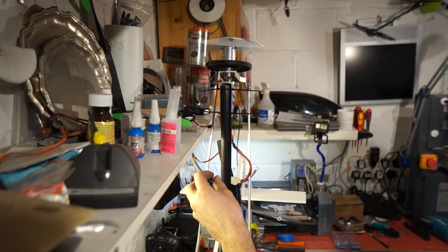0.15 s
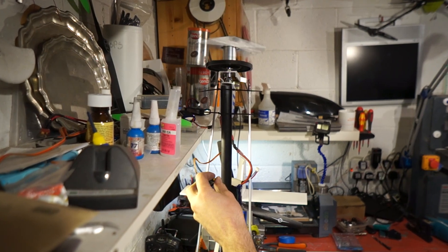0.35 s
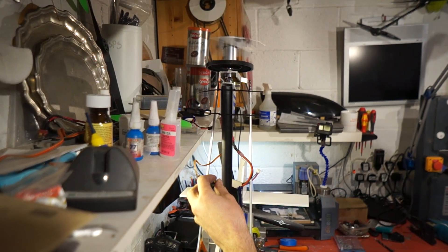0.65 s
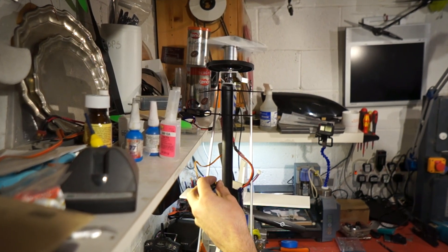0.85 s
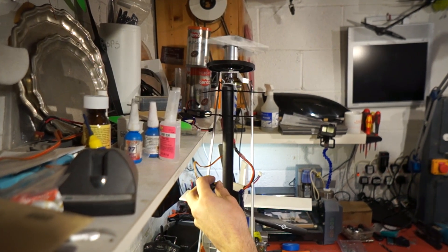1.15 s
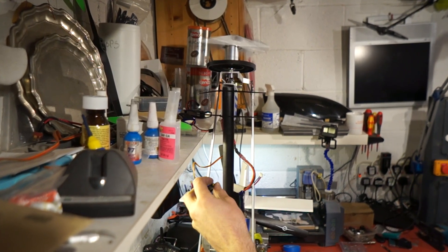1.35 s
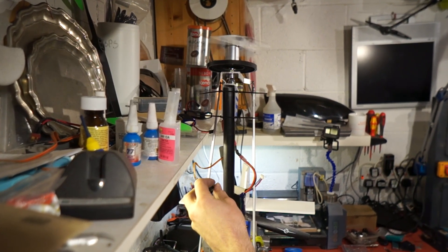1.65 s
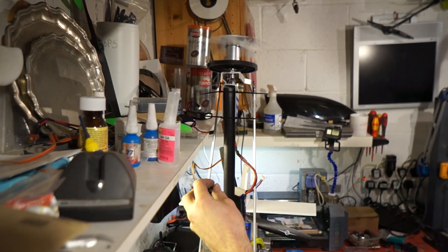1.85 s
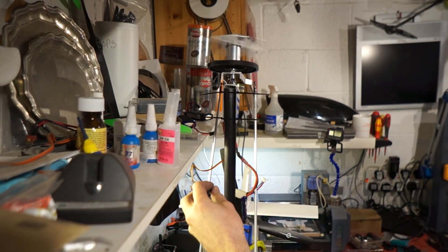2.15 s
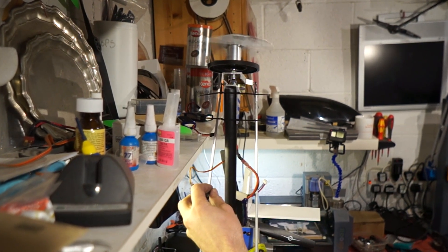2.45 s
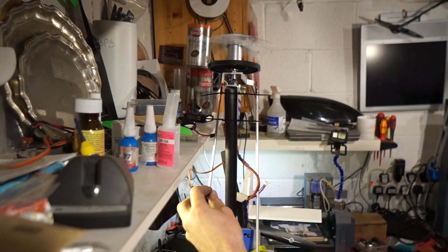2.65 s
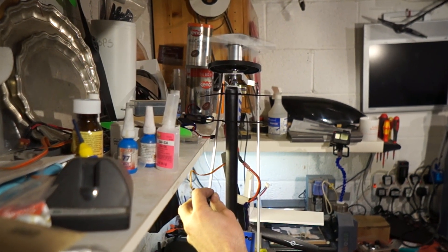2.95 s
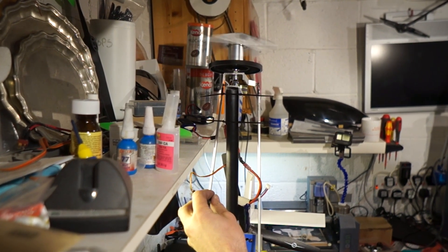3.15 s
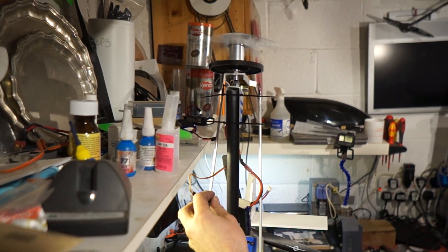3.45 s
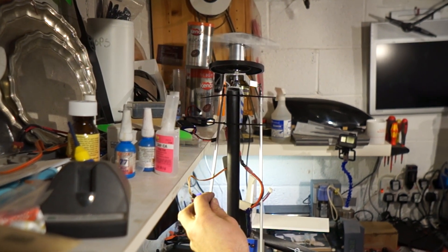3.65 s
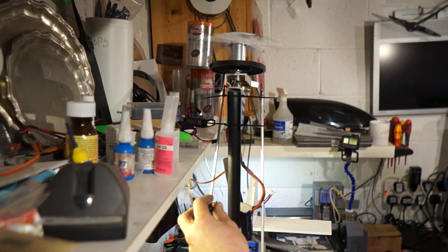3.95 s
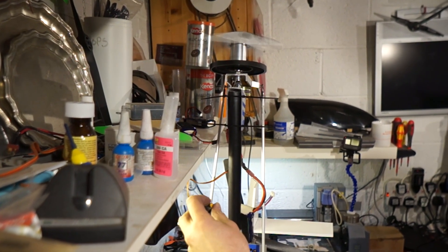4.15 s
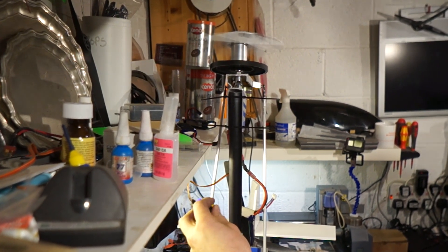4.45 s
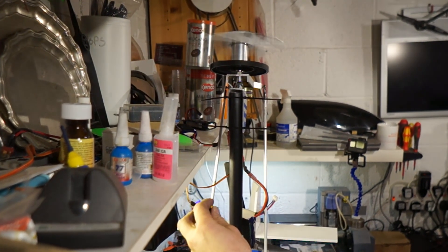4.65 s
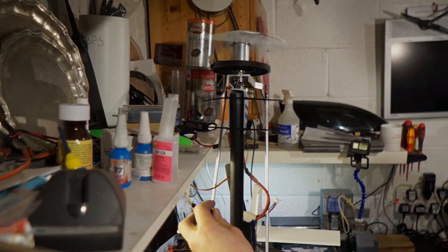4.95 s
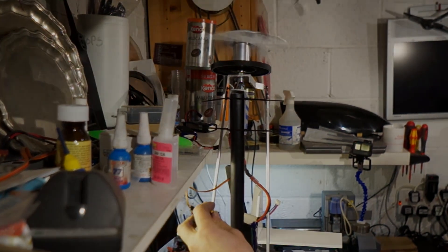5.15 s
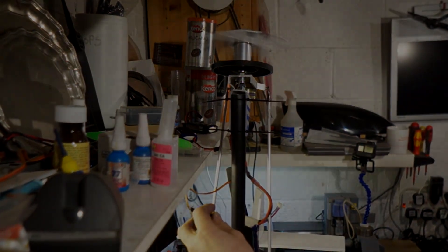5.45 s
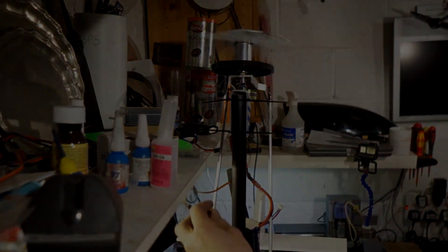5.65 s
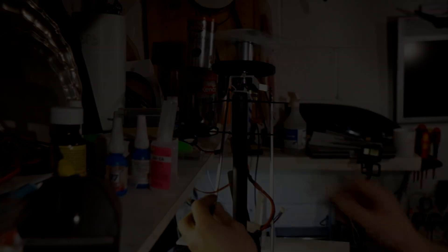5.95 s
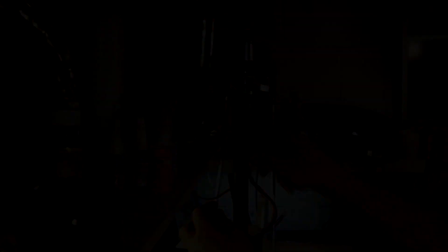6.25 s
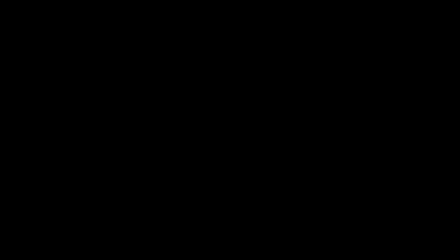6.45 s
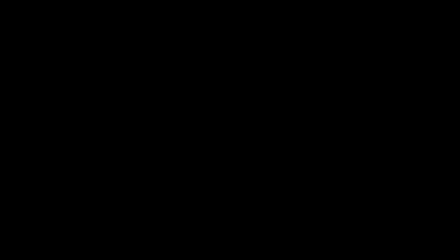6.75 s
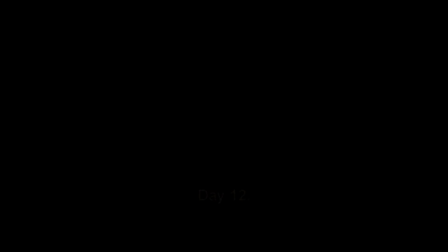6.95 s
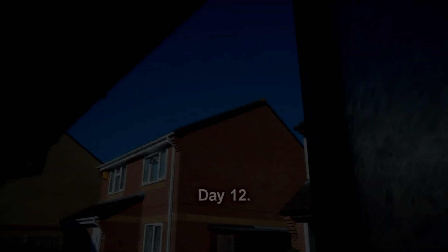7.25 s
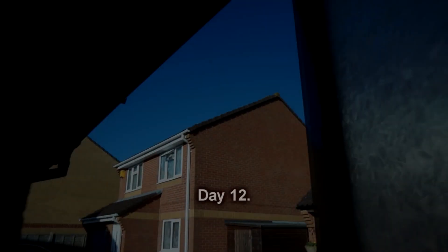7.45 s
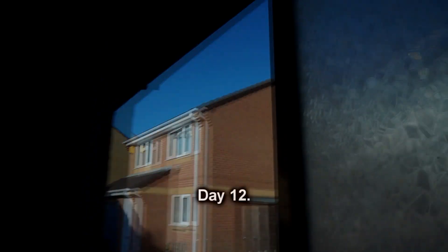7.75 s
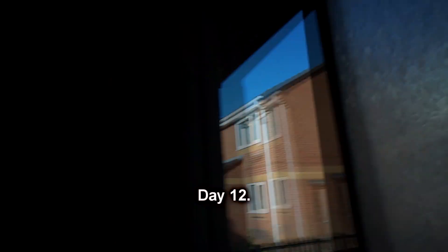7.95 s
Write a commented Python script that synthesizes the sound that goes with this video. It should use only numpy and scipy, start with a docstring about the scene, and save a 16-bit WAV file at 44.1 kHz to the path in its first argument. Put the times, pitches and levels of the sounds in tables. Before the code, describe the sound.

A small electric motor whines and scrapes, its pitch dipping then climbing as it fades away, then a quiet room and a window handle clunking.

```python
"""A small brushless motor on a workshop stand spins a geared, slightly loose rotor: its pole whine, made of
gliding sines, dips, climbs and settles, while shaped noise scrapes once a turn and rings the stand; it all fades out.
A quiet room by a window fades in as hiss and a far narrow-band drone, with two swept-sine bird chirps between houses,
a noise rustle, then a window handle that clicks, squeaks and clunks: noise bursts into ringing modes."""
import sys
import numpy as np
from scipy import signal
from scipy.fft import rfft, irfft, next_fast_len
from scipy.io import wavfile
from scipy.ndimage import uniform_filter1d, map_coordinates

SR = 44100
rng = np.random.default_rng(int(sys.argv[2]) if len(sys.argv) > 2 else 0)


def materialize(psi):
    """Save the field psi as 16-bit PCM at rate SR to the path in sys.argv[1].

    A 1-D psi becomes a single channel; in a 2-D psi each row is a channel.
    """
    bounded = np.clip(np.atleast_2d(psi).T, -1, 1)
    quanta = np.round(bounded * 32767).astype(np.int16)
    wavfile.write(sys.argv[1], SR, quanta)


def invert_db(level):
    """Linear amplitude ratio for a level in decibels (20 dB per decade), elementwise."""
    return 10 ** (np.asarray(level, dtype=float) / 20)


N = 357210

# motor speed, heard as the centre pitch of the pole whine: (time [s], whine pitch [Hz])
SPIN = [(0, 2115), (.25, 1912), (.35, 1855), (.55, 1805), (.65, 1835), (.75, 1912), (.85, 1960),
        (1.05, 2010), (1.3, 2038), (1.65, 2050), (1.95, 2168), (2.25, 2239), (2.45, 2310), (2.95, 2407),
        (3.15, 2430), (3.35, 2494), (3.55, 2580), (3.75, 2690), (3.95, 2755), (4.42, 2778), (4.49, 2874),
        (4.56, 2886), (6.8, 2885)]
# resonances of stand and rotor, before a lift common to all: (centre [Hz], width [Hz], level [dB])
STAND = [(200, 14, -5), (751, 14, -2), (1092.7, 26, 4), (1384, 68, -7), (1712, 24, -3), (2850, 230, -4),
         (3720, 320, -8.5), (4945, 110, -11), (5730, 500, -12), (6110, 150, -12.5), (7240, 190, -9),
         (10950, 110, -15), (8580, 320, -8.5), (9890, 310, -5.5), (4204, 63, -8.5), (13400, 230, -7.5),
         (15100, 330, -4.5)]
# start and end of the workshop's fade-out: (start [s], end [s])
FADE = (3, 6.8)
# left-right correlation by the window: (frequency [Hz], likeness [0-1])
ALIKE_ROOM = [(130, 0.81), (640, 0.84), (6800, 0.75), (15000, .99)]
# colour shared by room hiss and rustle: (frequency [Hz], relative level [dB])
AIR_COLOUR = [(60, -49.5), (130, -26), (274, -13), (400, -16.5), (636, -4), (1410, -10), (2800, -5),
              (6000, -13), (16000, -28.5)]
# ringing modes of the window frame: (frequency [Hz], relative level [dB], 60 dB decay time [s])
FRAME = [(290, -6.5, 0.076), (564, -1, 0.087), (700, -7.5, 0.025), (1057, -4, 0.057), (1500, -3.5, .06),
         (1790, -4.5, 0.038), (2300, -3, .03), (2720, -2.5, .04), (3190, -2.5, 0.054), (4000, -12, 0.035)]
WHINE_CYCLES = 14  # whine cycles per shaft turn


def unit(x):
    """Scaled to rms 1."""
    return x / np.sqrt(np.mean(x ** 2) + 1e-20)


def along(points, hz):
    """Value at each frequency, from (Hz, value) points joined on a log axis."""
    f, v = np.transpose(points)
    return np.interp(np.log(hz + 1), np.log(f + 1), v)


def curves(rows, edge=None):
    """One value per sample for each column after the time; edge is the value outside the listed times."""
    s, *cols = np.transpose(rows)
    return [np.interp(np.arange(N) / SR, s, c, edge, edge) for c in cols]


def wobble(rate):
    """A smooth random curve, rate knots a second."""
    knots = rng.standard_normal(int(N * rate / SR) + 4)
    return map_coordinates(knots, [np.arange(N) * rate / SR])


def filtered(x, response):
    """x filtered by a zero-phase gain over frequency."""
    m = next_fast_len(N + 8192)
    return irfft(rfft(x, m) * response(np.fft.rfftfreq(m, 1 / SR)), m)[..., :N]


def noise(gain, alike):
    """Stereo noise of rms 1, coloured by gain, its left-right correlation set by the mid/side balance."""
    def mid_side_gain(hz):
        turn = np.arccos(np.clip(along(alike, hz), -1, 1)) / 2
        return gain(hz) * [np.cos(turn), np.sin(turn)]

    mid, side = filtered(rng.standard_normal((2, N)), mid_side_gain)
    return unit(np.array([mid + side, mid - side]))


def tone(hz, db):
    """A sine that follows a pitch and an rms level."""
    phase = 2 * np.pi * np.cumsum(hz + np.zeros(N)) / SR
    return np.sqrt(2) * invert_db(db) * np.sin(phase)


def echoes(x, t60, delay):
    """A stereo tail of noise that dies by 60 dB in t60 seconds, silent until delay seconds."""
    t = np.arange(SR // 2) / SR
    tail = rng.standard_normal((2, len(t))) * invert_db(-60 * t / t60) * (t > delay)
    return signal.fftconvolve(x[None], tail / np.linalg.norm(tail[0]), axes=1)[:, :N]


def stand(hz, lift_db):
    """Gain of the ringing stand: resonant power peaks over a flat base."""
    peaks = sum(invert_db(2 * (db + lift_db)) / (1 + (2 * (hz - c) / w) ** 2) for c, w, db in STAND)
    return np.sqrt(1 + peaks)


def motor():
    """Pole whine and overtones, shaft unbalance, and the drive's switching tone beating with the whine."""
    # drive and overtone balance by motor speed: (whine pitch [Hz], switching tone [dB],
    # switching + whine tone [dB], fourth harmonic [dB], whine left-right difference [dB])
    speed_points = [(1800, -53, -47.5, -60, 1), (2060, -55.5, -50.5, -58.5, 0),
                    (2150, -50, -41.5, -57, -0.5), (2500, -52, -36.5, -55, 4), (2520, -56, -46, -44, 20.5),
                    (2650, -62, -56, -38, 4.5), (2760, -61, -65.5, -45.5, 1), (2910, -69, -72.5, -54, -7.5)]
    # how loudly motor and stand radiate whine and octave at each pitch: (frequency [Hz], level [dB])
    radiate = [(1800, -39.5), (1850, -51), (1885, -43), (1910, -38.5), (2035, -35.5), (2055, -49),
               (2120, -33), (2165, -46), (2190, -28.5), (2300, -38), (2365, -28.5), (2490, -37),
               (2770, -22.5), (2800, -35), (2850, -21.5), (3600, -42), (4050, -40), (4250, -34.5),
               (4430, -37), (4560, -32), (4700, -24), (5000, -29), (5070, -55.5), (5800, -54)]
    switching_hz = 8008
    hz, = curves(SPIN)
    speeds, *columns = np.transpose(speed_points)
    switching_db, beat_db, fourth_db, pan_db = [np.interp(hz, speeds, c) for c in columns]

    whine = tone(hz + 3 * wobble(40), along(radiate, hz) + 1.8 * wobble(25))
    whine = whine * invert_db([pan_db / 2, -pan_db / 2])
    octave = tone(2 * hz + 12 * wobble(90), along(radiate, 2 * hz) + 3.1 * wobble(40))
    octave = octave * invert_db(np.outer([1.2, -1.2], wobble(2.6)))  # drifts left and right
    fourth = tone(4 * hz + 14 * wobble(60), fourth_db + 1.5 * wobble(15))
    drive = tone(switching_hz, switching_db + 2.8 * wobble(5))
    drive = drive + tone(switching_hz + hz, beat_db + 2.3 * wobble(17))

    # the unbalance is heard only near the stand's lowest mode
    shaft_hz = hz / WHINE_CYCLES
    sway_hz, sway_width, _ = STAND[0]
    hum = tone(shaft_hz, -51 + .8 * wobble(18)) / (1 + (2 * (shaft_hz - sway_hz) / sway_width) ** 2)
    return whine + octave + drive + fourth + hum


def catches():
    """Time, length, catch level and late level of every rotor turn, geared down from the shaft with random slack."""
    # catches that stand out, each replacing the usual one of its turn:
    # (time [s], catch level [dB], level late in the turn [dB])
    standouts = [(.034, -21.5, -27), (.099, -23, -31.5), (.162, -19, -26), (.237, -20, -33.5),
                 (.302, -26, -31), (.383, -20, -31), (.606, -22, -24), (.681, -21.5, -20.5),
                 (.76, -19, -22.5), (.908, -19.5, -28.5), (.974, -20.5, -29.5), (1.042, -20, -28),
                 (1.118, -21, -22.5), (1.253, -21, -22), (1.386, -21.5, -21), (1.457, -19.5, -20.5),
                 (1.598, -20.5, -22), (1.675, -21.5, -18.5), (1.798, -21, -20.5), (2.311, -22.5, -29),
                 (2.436, -21.5, -31), (3.201, -21.5, -24.5), (3.258, -22, -23), (3.65, -20.5, -24),
                 (3.807, -20.5, -21), (3.908, -20, -21), (4.205, -18.5, -22.5), (4.408, -18, -23),
                 (4.616, -21.5, -31), (4.9, -20, -26)]
    gear, first_turn, slack = 10.02, .39, .045  # shaft turns per rotor turn; first catch and scatter [turns]
    usual_catch_db, usual_late_db = -21.5, -25
    rate = curves(SPIN)[0] / (WHINE_CYCLES * gear)  # rotor turns per second
    angle = np.cumsum(rate) / SR
    luck = rng.standard_normal((int(angle[-1]), 3))

    catch_angle = first_turn + np.arange(len(luck)) + slack * luck[:, 0]
    s = np.interp(catch_angle, angle, np.arange(N) / SR)
    catch_db = usual_catch_db + 1.2 * luck[:, 1]
    late_db = usual_late_db + 2.3 * luck[:, 2]
    own_s, own_db, own_late_db = np.transpose(standouts)
    own = np.round(angle[(own_s * SR).astype(int)] - first_turn).astype(int)
    s[own], catch_db[own], late_db[own] = own_s, own_db, own_late_db
    return s, 1 / rate[(s * SR).astype(int)], catch_db, late_db


def patchy(x, depth_db):
    """Random gain patches in time and frequency, a few hundred hertz wide, alike in both channels."""
    z = signal.stft(x, nperseg=256)[2]
    field = uniform_filter1d(rng.standard_normal(z.shape[1:]), 3, 0)
    field = uniform_filter1d(field, 12, 1)
    return unit(signal.istft(z * invert_db(depth_db * unit(field)), nperseg=256)[1][:, :N])


def rotor():
    """Each turn the loose rotor catches suddenly, drags and lets go; small rattles roughen the drag."""
    # broad colour of the scrape: (frequency [Hz], relative level [dB])
    scrape_colour = [(400, -43), (1000, -16), (2900, -12), (6000, -3.5), (8000, -10.5), (10000, -10.5),
                     (14500, -16), (16000, -27)]
    # broad colour of the steady whirr under it: (frequency [Hz], relative level [dB])
    whirr_colour = [(25, -50.5), (100, -36), (450, -23), (700, -13), (1050, -6.5), (1500, -14.5),
                    (2900, -9), (6000, -11), (9000, -15), (16000, -28)]
    # left-right correlation in the workshop: (frequency [Hz], likeness [0-1])
    likeness = [(400, 0.99), (3300, .9), (6000, 0.93), (10000, 1), (15000, 1)]
    s, turn, catch_db, late_db = catches()
    free_db = np.roll(late_db, 1) - 5.0  # lighter contact just before the catch
    times = np.ravel([s - .004, s + 0.0054, s + 0.27 * turn, s + 0.69 * turn], order="F")
    levels = np.ravel([free_db, catch_db + 0.33, catch_db - .6, late_db], order="F")
    drag_db = np.interp(np.arange(N) / SR, np.maximum.accumulate(times), levels)

    grit = unit(invert_db(1.76 * wobble(500) + 0.35 * wobble(60)))
    rubbing = noise(lambda hz: invert_db(along(scrape_colour, hz)) * stand(hz, 19.9), likeness)
    scrape = invert_db(drag_db) * grit * patchy(rubbing, depth_db=2.5)
    sizzle = filtered(scrape, lambda hz: 1 / (1 + (8000 / (hz + 1)) ** 4))
    scrape = scrape + (invert_db(0.97 * (drag_db + 21.5)) - 1) * sizzle  # a harder catch is also brighter

    # the whirr only partly follows the drag, and settles as the speed rises
    sway_db = 0.21 * (drag_db + 30) + 1.1 * wobble(30) + 1.65 * wobble(7)
    speed_db = -27 - 0.5 * (curves(SPIN)[0] / 1000 - 2)  # -0.5 dB per kHz of whine above 2 kHz
    whirr = noise(lambda hz: invert_db(along(whirr_colour, hz)) * stand(hz, 8.3), likeness)
    return scrape + invert_db(speed_db + sway_db) * whirr


def room():
    """Quiet room: coloured noise as hiss, and a narrow noise band as a far drone with a faint overtone."""
    # (time [s], room hiss level [dB], far drone level [dB])
    room_levels = [(6.8, -93, -77), (6.9, -75.5, -60.5), (7.2, -68.5, -65), (7.32, -68.5, -70),
                   (7.38, -63.5, -84.5), (7.7, -60, -85.5), (8.1, -56.5, -87)]
    hiss_db, drone_db = curves(room_levels)
    hiss = noise(lambda hz: invert_db(along(AIR_COLOUR, hz)), ALIKE_ROOM)
    drone = noise(lambda hz: 1 / (1 + ((hz - 1020) / 45) ** 2) + 0.09 / (1 + ((hz - 2825) / 25) ** 2),
                  ALIKE_ROOM)
    air = invert_db(hiss_db) * hiss + invert_db(drone_db) * drone
    return air * (np.arange(N) > FADE[1] * SR)


def bird():
    """Quick upward chirps, sines on a flattening sweep, heard mostly as echoes off the houses."""
    # (time [s], start pitch [Hz], top pitch [Hz], length [s], direct peak level [dB])
    chirps = [(6.925, 4400, 5900, .035, -62.5), (7.022, 3960, 5020, .04, -56)]
    calls = np.zeros(N)
    for s, start_hz, top_hz, length, db in chirps:
        u = np.linspace(0, 1, int(length * SR))
        hz = top_hz + (start_hz - top_hz) * np.exp(-(u / 0.404) ** 2)
        chirp = np.sin(np.pi * u) * np.sin(2 * np.pi * np.cumsum(hz) / SR)
        calls[round(s * SR):][:len(u)] += invert_db(db) * chirp
    return calls + invert_db(8.0) * echoes(calls, t60=0.78, delay=0.0073)


def rustle():
    """A short rustle: air-coloured noise whose level flutters."""
    # centre of the fluttering level: (time [s], level [dB])
    rustle_levels = [(7.335, -74.5), (7.35, -65), (7.47, -59), (7.51, -68), (7.6, -75), (7.69, -65.5)]
    level_db = curves(rustle_levels, edge=-120)[0] + 3.1 * wobble(67)
    return invert_db(level_db) * noise(lambda hz: invert_db(along(AIR_COLOUR, hz)), ALIKE_ROOM)


def handle_slide():
    """Parts sliding in the handle: fluttering noise coloured by the frame's modes."""
    # centre of the fluttering level: (time [s], level [dB])
    slide_levels = [(7.71, -42), (7.77, -44), (7.82, -38), (7.87, -29.5), (7.92, -43.5), (8.012, -49.5),
                    (8.016, -38), (8.04, -45), (8.1, -52)]
    # broad colour: (frequency [Hz], relative level [dB])
    slide_colour = [(80, -30), (200, -8.5), (350, -5.5), (3300, -1), (6000, 1.5), (16000, -17)]

    def gain(f):
        modes = 0.14 + sum(invert_db(d) / (1 + ((f - c) / 120) ** 2) for c, d, _ in FRAME)
        return modes * invert_db(along(slide_colour, f))

    level_db = curves(slide_levels, edge=-120)[0] + 2.5 * wobble(90)
    return invert_db(level_db) * noise(gain, ALIKE_ROOM)


def handle_contacts():
    """Each contact is a short rattle that rings the frame's modes near its centre, plus a bright crack."""
    # (time [s], strength [dB], centre [Hz])
    contacts = [(7.711, -37, 900), (7.726, -23.5, 3400), (7.777, -35, 2300), (7.804, -25.5, 2000),
                (7.816, -24, 1600), (7.832, -32, 1500), (7.853, -19.5, 2940), (7.863, -19, 560),
                (7.868, -23.5, 2200), (7.877, -24, 602), (7.905, -30, 449), (7.929, -29.5, 350),
                (8.013, -32, 1800)]
    out, t = np.zeros(N + SR), np.arange(SR // 5) / SR
    hz, level_db, t60 = np.transpose(FRAME)[:, :, None]
    for s, db, centre_hz in contacts:
        gain_db = level_db - 12 * np.log2(hz / centre_hz) ** 2 + 3 * rng.standard_normal(hz.shape)
        ring = np.sum(invert_db(gain_db - 60 * t / t60) * np.sin(2 * np.pi * hz * t), axis=0)
        rattle = invert_db(-60 * t / 0.03) * rng.standard_normal(len(t))
        crack = invert_db(-1.5) * (centre_hz / 3000) ** 2 * (rattle - uniform_filter1d(rattle, size=16))
        rung = signal.fftconvolve(ring, rattle / np.linalg.norm(rattle))[:len(t)]
        out[round(s * SR):][:len(t)] += invert_db(db) * (rung + crack)
    # small, padded parts: little below 210 Hz, softened towards 9 kHz
    return filtered(out[:N], lambda f: f ** 4 / (f ** 4 + 210 ** 4) / (1 + (f / 9000) ** 2))


def handle_squeak():
    """The handle's metal squeak in slips: a high sine, rough in pitch and level."""
    # centre of the roughness: (time [s], pitch [Hz], level [dB])
    slips = [(7.776, 9900, -66), (7.782, 9890, -32), (7.795, 9800, -41), (7.806, 9540, -33),
             (7.865, 9760, -61)]
    hz = curves(slips)[0] + 90 * wobble(300)
    return tone(hz, curves(slips, edge=-120)[1] + 4 * wobble(150))


def handle():
    """Contacts and squeak reach the right channel 1 dB louder than the left, with a short echo tail; parts
    slide."""
    near = handle_contacts() + handle_squeak()
    return (
            handle_slide() + near * invert_db([[-.5], [.5]]) + invert_db(-13.5) * echoes(near, t60=0.21, delay=0.0015))


def scene():
    """The workshop fades out, then the window."""
    fade = np.clip((FADE[1] - np.arange(N) / SR) / (FADE[1] - FADE[0]), 0, 1) ** 0.88
    return fade * (motor() + rotor()) + room() + bird() + rustle() + handle()


def band_limit(x):
    """A steep low-pass at the top of the band."""
    return signal.sosfilt(signal.butter(12, 16680, fs=SR, output="sos"), x)


def record(dry):
    """Nothing is kept at or above the band limit of 15680 Hz."""
    mix = filtered(dry, lambda hz: hz < 15680)
    return band_limit(mix)


dry = scene()
out = record(dry)
materialize(out)
```